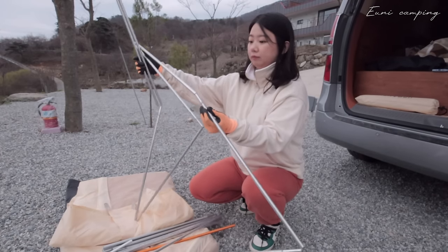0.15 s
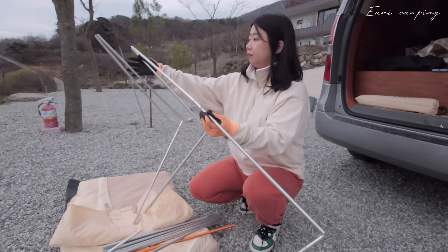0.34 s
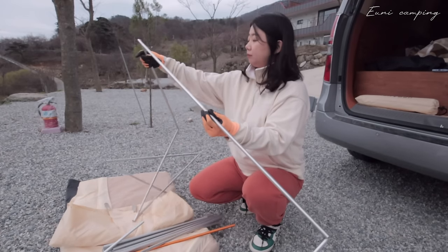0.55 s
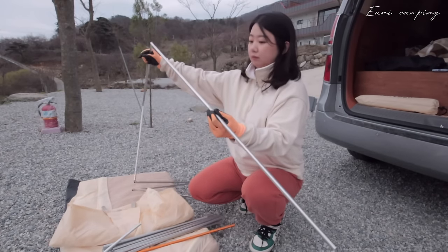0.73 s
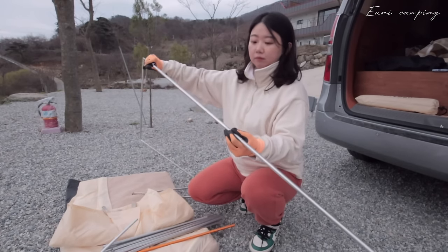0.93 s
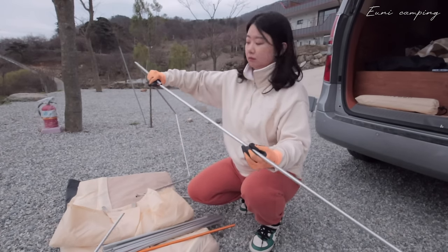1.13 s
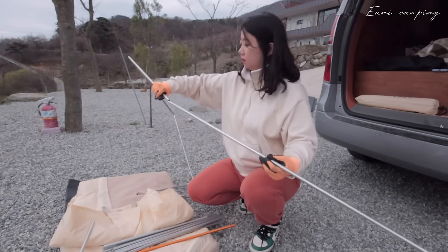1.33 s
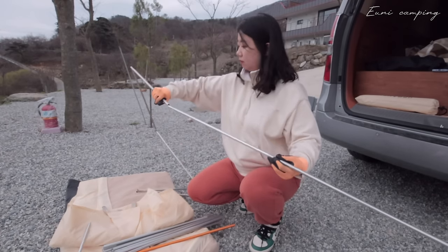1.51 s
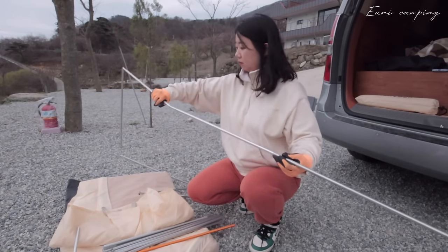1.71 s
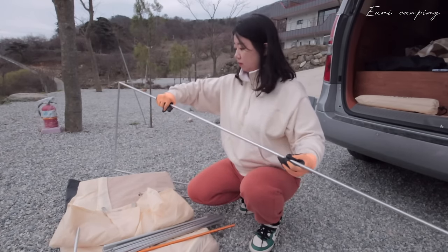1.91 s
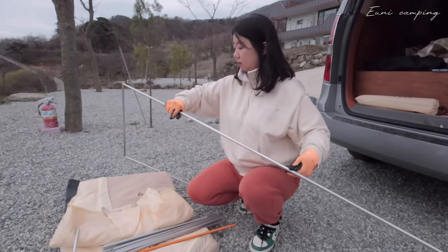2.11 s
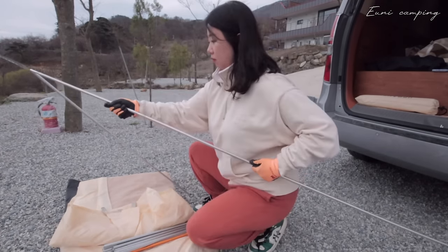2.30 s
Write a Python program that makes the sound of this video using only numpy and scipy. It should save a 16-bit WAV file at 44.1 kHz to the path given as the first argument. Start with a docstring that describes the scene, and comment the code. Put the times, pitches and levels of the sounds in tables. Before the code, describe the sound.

Hollow metal tubes tap, scrape and clink rapidly for about a second, two loud snaps standing out, then isolated clicks with gaps between; heard close and dry outside, over a very faint airy background.

```python
"""Outdoors, over gravel, a folded metal tent pole on an elastic cord is shaken out.
Its sections rasp in streams of tiny slips, clink in short buzzes and squeak in gliding tones.
Hollow-sounding knocks hit the ground or hand, a glove rubs softly, and joints snap into their sockets.
Close microphones hear the pole slightly from the left, over a quiet background of filtered noise."""
import sys
import numpy as np
from scipy import signal
from scipy.fft import rfft, irfft
from scipy.io import wavfile

SR = 44100
rng = np.random.default_rng(int(sys.argv[2]) if len(sys.argv) > 2 else 0)


def transcribe(u):
    """Save the signal u as a 16-bit wav file named by the first command-line argument.

    u: samples, shape (n,) or (channels, n), limited to [-1, 1]; the rate is SR.
    q: integer samples, one column per channel.
    """
    v = np.clip(np.atleast_2d(u).T, -1, 1)
    q = np.round(v * 32767).astype(np.int16)
    wavfile.write(sys.argv[1], SR, q)


N = 103635

# All levels are before later filters; in all colours only the shape of the curve matters.
# Open air colour: (frequency [Hz], level [dB])
AIR_COLOUR = [(15, -53.5), (25, 2), (545, -3.5), (1260, -3.5), (1990, -3.5), (16000, -19.5)]
# Echo from the car: (delay [s], level [dB])
ECHOES = [(0.0235, -28)]
# A joint squeaks: (time [s], length [s], level [dB], start pitch [Hz], end pitch [Hz])
SQUEAKS = [(0.065, 0.047, -39.5, 1502, 1130), (0.095, 0.072, -52, 1555, 1800),
           (0.992, 0.1175, -35.5, 5550, 5825), (1.009, 0.098, -37, 8250, 10050)]
# Dull knocks of the pole on the ground or in the hand: (time [s], level [dB])
KNOCKS = [(0.4445, -38.5), (0.455, -35), (0.4986, -40.5), (0.6077, -41.5), (0.6145, -28.5), (.667, -20.5),
          (.675, -27.5), (0.683, -33.5), (0.695, -49), (1.286, -53.5), (1.32, -58), (1.989, -51),
          (2.2858, -43.5)]
# Knock colour: (frequency [Hz], level [dB])
KNOCK_COLOUR = [(80, -26.5), (150, -10.5), (450, -16.5), (900, -11.5), (2100, -18), (8000, -26.5),
                (12000, -39.5)]
# Low hollow resonances of a knock: (frequency [Hz])
KNOCK_MODES_HZ = [360, 624, 800, 1125]
# Rubs and slides: metal on metal, and a soft glove rub at 1.277 s:
#   (time [s], attack [s], hold [s], release [s], level [dB], ring [Hz], ring strength [dB])
RUBS = [(0.034, 0.037, 0.12, 0.15, -45, 3720, -44), (0.219, 0.0047, 0.052, 0.06, -43.5, 1970, -18.5),
        (0.334, 0.0053, 0.011, 0.085, -36.5, 3370, -8), (0.437, 0.01, 0.0066, 0.023, -29, 4500, -50),
        (0.774, 0.0091, 0.071, 0.12, -47, 5700, -5.5), (1.021, 0.04, 0.02, 0.041, -52, 4400, -4),
        (1.277, 0.01, 0.029, 0.0065, -67, 1000, -3), (1.474, 0.02, 0.284, 0.013, -61.5, 5700, -14.5),
        (1.873, 0.012, 0.0098, 0.04, -47.5, 2250, -16), (1.992, 0.006, 0.014, 0.013, -48.5, 930, -7.5),
        (2.21, 0.0012, 0.015, 0.14, -49, 4050, -20.5)]
# Colour of the rubs and slides: (frequency [Hz], level [dB])
RUB_COLOUR = [(100, 0.5), (600, -11.5), (1300, -6.5), (2200, -2.5), (3500, 3), (7300, 3.5), (9000, -3),
              (11000, -10.5), (16000, -21.5)]
# Drier taps, a bending wave with a softer buzz and a quick rebound: (time [s], level [dB])
TAPS = [(0.212, -6), (0.2844, -5), (0.3185, -6), (0.3913, -8), (0.7736, -7), (0.928, -17.5), (1.056, -17)]
# Sections clink together: (time [s], level [dB], ring [Hz])
CLINKS = [(0.0884, -38, 7200), (0.231, -32.5, 2020), (0.2319, -33.5, 3600), (0.272, -33, 5100),
          (0.2762, -38, 7600), (0.3413, -31.5, 3000), (0.3475, -34, 6430), (0.4252, -26.5, 4820),
          (0.4845, -21.5, 5460), (0.673, -25.5, 2280), (0.8342, -35, 7800), (0.870, -34.5, 7460),
          (0.887, -31, 5130), (1.0149, -39, 5640), (1.056, -35.5, 9300), (1.1158, -48, 7300),
          (1.138, -45, 7550), (1.4505, -32.5, 5820), (1.646, -44.5, 5740)]
# Colour shared by clinks and taps: (frequency [Hz], level [dB])
CLINK_COLOUR = [(100, -29), (900, -27), (1800, -15.5), (3300, -8.5), (7300, -1), (8800, -4.5), (10500, -11),
                (16000, -26.5)]
# A joint snaps home: (time [s], level [dB], low edge [Hz], top edge [Hz], three rings [Hz],
#   ring strength [dB], sizzle [dB], rattle [dB], left over right [dB])
SNAPS = [(0.4986, -11, 1930, 8040, 1400, 3910, 6330, -10.5, -16.5, 1.5, -1),
         (0.6952, -9, 2850, 8870, 3770, 4900, 7870, -14, -16.5, 5, 2),
         (0.7760, -22.5, 3140, 7700, 3400, 5400, 7050, -6.5, -3.5, 9.5, 2),
         (1.4440, -28, 2300, 10400, 4120, 5730, 8180, -7, -6, 5.5, 1),
         (1.7227, -20.5, 2270, 7700, 2860, 3400, 4700, -16, -24, 3.5, -1),
         (1.9861, -14, 1430, 8500, 2440, 5870, 6700, -14, -9.5, 2.5, -0.5),
         (2.2837, -28.5, 1040, 2870, 1200, 1680, 2360, 0, -26, -11.5, -3.5)]
# Resonances of the metal tube: (frequency [Hz])
TUBE_MODES_HZ = [2296, 2833, 3400, 4030, 4440, 5130, 5400, 6200, 6250]

TIME = np.arange(N) / SR
HIT_SAMPLES = SR // 5
AIR_DB, AIR_SIDE_DB = -61.5, -6.5
LEFT_LEAD_S, SIDE_DB, POLE_PAN_DB = .000046, -9.5, 1.5
# Shared by all hits: roughness of the buzz, and the rebound
RAGGED_DB, RAGGED_HZ, BOUNCE_DB = 3, 300, -9
RING_GAIN = 5  # a ring strength of 0 dB means this gain
RING_WIDTH_HZ, RING_FLUTTER_DB, RING_FLUTTER_HZ = 600, 6.5, 29.7
BEND_DELAY_MS = 1.097  # travel time along a section at 1 kHz
SQUEAK_JITTER_HZ, SQUEAK_ROUGH = 90, 0.77
KNOCK_CRACK_S, KNOCK_RATTLE_S, KNOCK_RATTLE_DB, KNOCK_TAIL_S, KNOCK_TAIL_DB = 0.0024, 0.017, -5, 0.008, -24
KNOCK_PUSH_DB, KNOCK_CONTACT_HZ, KNOCK_WIDTH_HZ, KNOCK_RING_DB = 18.5, 3480, 100, -3
GRAINS_PER_S, GRAIN_SPREAD_DB, JUDDER_DB, JUDDER_HZ = 3800, 1, 1.5, 74
OVERTONE_RATIO, OVERTONE_DB = 1.705, -2.5
CLINK_CRACK_S, CLINK_TAIL_S, CLINK_TAIL_DB = .002, .028, -20
CLINK_RATTLE_S, CLINK_RATTLE_DB, CLINK_RING_DB, CLINK_TICK_DB = 0.0099, 2, -6.5, 4
TAP_BUZZ_DB, TAP_RATTLE_DB = -24, -7.5
SNAP_CRACK_S, SNAP_RATTLE_S, SNAP_TAIL_S, SNAP_TAIL_DB = 0.00048, .0062, 0.015, -7
SNAP_PUSH_DB, SNAP_BASS_DB, SNAP_RING_WIDTH_HZ, SIZZLE_TOP_HZ = 22, -18.5, 232, 13500
POLE_LOW_HZ, TUBE_WIDTH_HZ, TUBE_DB = 220, 60, -8
CLIP_LEVEL, CUTOFF_HZ = 1.1, 16100


def from_db(db):
    """Turn decibels into a plain gain."""
    return 10 ** (np.asarray(db) / 20)


def rms_one(x):
    """Scale a signal to an average strength (RMS) of 1."""
    return x / np.sqrt(np.mean(x ** 2) + 1e-20)


def butter(x, hz, kind, order=2):
    """Smooth filter that keeps the lows, the highs or a band."""
    edges = np.clip(hz, 10, SR * .45)
    return signal.sosfilt(signal.butter(order, edges, kind, fs=SR, output="sos"), x)


def resonate(x, hz, width_hz):
    """One resonance, with a gain of about 1 at its peak; a narrow one rings longer."""
    r = np.exp(-np.pi * width_hz / SR)
    forward = np.array([1, 0, -1]) * (1 - r * r) / 2
    feedback = [1, -2 * r * np.cos(2 * np.pi * hz / SR), r * r]
    return signal.lfilter(forward, feedback, x + 1e-18)


def colour(x, points, size=4096):
    """Filter that follows a spectrum, never sounds early and keeps the power of white noise."""
    hz, db = np.transpose(points)
    bins_hz = np.arange(size // 2 + 1) * SR / size
    gain = from_db(np.interp(np.log(bins_hz + 1), np.log(hz), db))
    # Folding the cepstrum puts the filter's energy as early as possible.
    cepstrum = irfft(np.log(rms_one(gain)))[:size // 2]
    cepstrum[1:] *= 2
    response = irfft(np.exp(rfft(cepstrum, size)))
    return signal.fftconvolve(x, response[None], axes=1)[:, :x.shape[1]]


def wander(hz):
    """Random motion, no faster than about the given frequency, spread 1."""
    return rms_one(butter(rng.standard_normal(N + SR), hz, "low")[SR:])


def spread(pair, side_db):
    """Turn two unrelated signals into a mostly alike left and right."""
    return pair[0] + from_db(side_db) * pair[1] * np.array([[1], [-1]])


def add(out, x, s, pan_db=0):
    """Mix a sound in at a time; a positive pan makes the left louder."""
    i = max(int(s * SR), 0)
    panned = x * from_db([[pan_db / 2], [-pan_db / 2]])
    out[:, i:i + x.shape[1]] += panned[:, :out.shape[1] - i]


def impact(crack_s, rattle_s, rattle_db, tail_s, tail_db):
    """A crack, a ragged buzz of micro-contacts and a spread-out tail, with one quick rebound."""
    t = np.arange(HIT_SAMPLES) / SR
    crack = np.exp(-t / crack_s)
    rattle = from_db(rattle_db) * np.exp(-t / rattle_s)
    tail = from_db(tail_db) * np.exp(-t / tail_s)
    ragged = rms_one(from_db(RAGGED_DB * wander(RAGGED_HZ)[:HIT_SAMPLES]))
    after = np.hypot(rattle, tail) * ragged
    signs = rng.choice([-1., 1.], (2, HIT_SAMPLES))
    hit = spread(signs * [np.hypot(crack, after), after], SIDE_DB)
    out = hit.copy()
    add(out, from_db(BOUNCE_DB) * hit, rng.uniform(.0006, .00276))
    return out / np.hypot(1, from_db(BOUNCE_DB))


def with_ring(x, rings_hz, ring_db, width_hz):
    """Lift the resonances of the section that is touched."""
    ringing = sum(resonate(x, hz, width_hz) for hz in rings_hz)
    return x + RING_GAIN * from_db(ring_db) * ringing


def bending_pulse():
    """One push travels along the tube as a bending wave: the treble arrives first, the lows trail."""
    khz = np.arange(HIT_SAMPLES // 2 + 1) * SR / HIT_SAMPLES / 1000
    return irfft(np.exp(-4j * np.pi * BEND_DELAY_MS * np.sqrt(khz)), HIT_SAMPLES)[None]


def open_air():
    """Quiet outdoor background: steady coloured noise, partly different left and right."""
    noise = spread(rng.standard_normal((2, N)), AIR_SIDE_DB)
    return from_db(AIR_DB) * rms_one(colour(noise, AIR_COLOUR))


def echoes(pole):
    """The car sends back a late, faint and duller copy of the pole."""
    out = np.zeros((2, N))
    for delay_s, db in ECHOES:
        add(out, from_db(db) * butter(pole, 5700, "low"), delay_s)
    return out


def squeaks():
    """Joints rub briefly: gliding tones with a trembling pitch and a rough loudness."""
    out = np.zeros((2, N))
    for s, length_s, db, start_hz, end_hz in SQUEAKS:
        progress = np.minimum(TIME / length_s, 1)
        hz = start_hz + (end_hz - start_hz) * progress + SQUEAK_JITTER_HZ * wander(233)
        tone = np.sin(2 * np.pi * np.cumsum(hz) / SR)
        rough_tone = tone * (1 + SQUEAK_ROUGH * wander(180))
        swell = np.sin(np.pi * progress) ** 2
        add(out, (from_db(db) * rough_tone * swell)[None], s)
    return out


def knocks():
    """The pole bumps something dull: one push into its hollow low modes, then a short crunch."""
    out = np.zeros((2, N))
    push = butter(signal.unit_impulse(HIT_SAMPLES), KNOCK_CONTACT_HZ, "low", order=1)
    for s, db in KNOCKS:
        hit = impact(KNOCK_CRACK_S, KNOCK_RATTLE_S, KNOCK_RATTLE_DB, KNOCK_TAIL_S, KNOCK_TAIL_DB)
        hit += from_db(KNOCK_PUSH_DB) * push
        add(out, from_db(db) * hit, s)
    hollow = sum(resonate(out, hz, KNOCK_WIDTH_HZ) for hz in KNOCK_MODES_HZ)
    return colour(out + from_db(KNOCK_RING_DB) * hollow, KNOCK_COLOUR)


def rubs():
    """Dense stick-slip grains excite the tube; its rings swell and fade as the contact moves."""
    out = np.zeros((2, N))
    for s, attack_s, hold_s, release_s, db, ring_hz, ring_db in RUBS:
        slips = (rng.random((2, N)) < GRAINS_PER_S / SR) * rng.choice([-1, 1], (2, N))
        strengths = from_db(GRAIN_SPREAD_DB * np.minimum(rng.exponential(1, (2, N)), 5))
        grains = spread(rms_one(slips * strengths), SIDE_DB)
        attack = np.minimum(TIME / attack_s, 1)
        release = np.exp(-np.maximum(TIME - attack_s - hold_s, 0) / release_s)
        rasp = grains * attack * release * from_db(db + JUDDER_DB * wander(JUDDER_HZ))
        # The overtone and the main ring flutter separately.
        overtone_db = ring_db + OVERTONE_DB + RING_FLUTTER_DB * wander(RING_FLUTTER_HZ)
        rasp = with_ring(rasp, [ring_hz * OVERTONE_RATIO], overtone_db, RING_WIDTH_HZ)
        main_db = ring_db + RING_FLUTTER_DB * wander(RING_FLUTTER_HZ)
        add(out, with_ring(rasp, [ring_hz], main_db, RING_WIDTH_HZ), s, POLE_PAN_DB)
    return colour(out, RUB_COLOUR)


def taps():
    """Two tubes touch in a drier tap: a bending wave with a softer buzz and a quick rebound."""
    out = np.zeros((2, N))
    for s, db in TAPS:
        buzz = impact(CLINK_CRACK_S, CLINK_RATTLE_S, TAP_RATTLE_DB, CLINK_TAIL_S, CLINK_TAIL_DB)
        add(out, from_db(db) * (bending_pulse() + from_db(TAP_BUZZ_DB) * buzz), s, POLE_PAN_DB)
    return colour(out, CLINK_COLOUR)


def clinks():
    """Loose sections tap each other: a hard first tick, then a short buzz."""
    out = np.zeros((2, N))
    for s, db, ring_hz in CLINKS:
        hit = impact(CLINK_CRACK_S, CLINK_RATTLE_S, CLINK_RATTLE_DB, CLINK_TAIL_S, CLINK_TAIL_DB)
        hit[:, 0] += from_db(CLINK_TICK_DB)
        ringing_hit = with_ring(hit, [ring_hz], CLINK_RING_DB, RING_WIDTH_HZ)
        add(out, from_db(db) * ringing_hit, s, POLE_PAN_DB)
    return colour(out, CLINK_COLOUR)


def snaps():
    """The cord pulls each joint into its socket, with a band and rings of its own."""
    out = np.zeros((2, N))
    for s, db, low_hz, top_hz, *rings_hz, ring_db, sizzle_db, rattle_db, pan_db in SNAPS:
        hit = impact(SNAP_CRACK_S, SNAP_RATTLE_S, rattle_db, SNAP_TAIL_S, SNAP_TAIL_DB)
        hit = hit + from_db(SNAP_PUSH_DB) * bending_pulse()
        body = butter(butter(hit, low_hz, "high", order=6), top_hz, "low", order=7)
        ringing_body = with_ring(body, rings_hz, ring_db, SNAP_RING_WIDTH_HZ)
        sizzle_band_hz = [min(top_hz, SIZZLE_TOP_HZ - 1000), SIZZLE_TOP_HZ]
        sizzle = from_db(sizzle_db) * butter(hit, sizzle_band_hz, "band")
        bass = from_db(SNAP_BASS_DB) * butter(hit, [500, low_hz], "band")
        add(out, from_db(db) * (ringing_body + sizzle + bass), s, pan_db)
    return out


def tube_ring(contacts):
    """The contact sounds set the tube's own resonances ringing."""
    return from_db(TUBE_DB) * sum(resonate(contacts, hz, TUBE_WIDTH_HZ) for hz in TUBE_MODES_HZ)


def left_first(pole):
    """Sound reaches the left microphone first, so the right side is delayed a little."""
    # The delay is a fraction of samples, so it is made by turning the phase.
    lag = np.exp(-2j * np.pi * np.arange(N + 1) / (2 * N) * SR * LEFT_LEAD_S)
    return np.array([pole[0], irfft(rfft(pole[1], 2 * N) * lag)[:N]])


def scene():
    """The pole with its ring and echoes, over the open air."""
    contacts = butter(rubs() + taps() + clinks() + snaps(), POLE_LOW_HZ, "high")
    pole = squeaks() + knocks() + contacts + tube_ring(contacts)
    return open_air() + echoes(pole) + left_first(pole)


def record(dry):
    """Strong peaks overload the recorder and are rounded off; the highest treble is cut."""
    rounded = CLIP_LEVEL * dry / (CLIP_LEVEL ** 4 + dry ** 4) ** (1 / 4)
    return signal.sosfilt(signal.ellip(10, .2, 70, CUTOFF_HZ, fs=SR, output="sos"), rounded)


dry = scene()
out = record(dry)
transcribe(out)
```